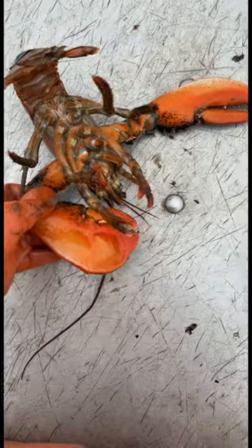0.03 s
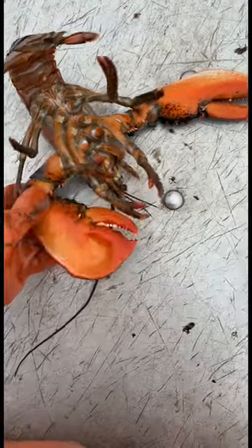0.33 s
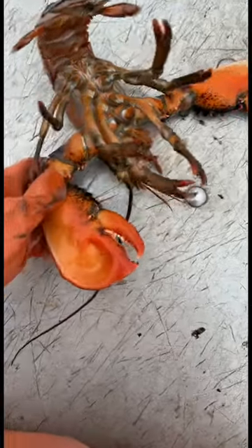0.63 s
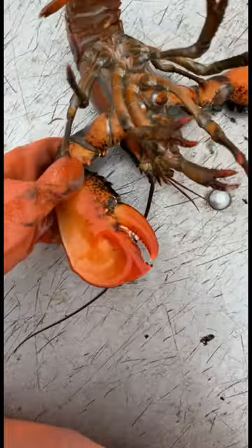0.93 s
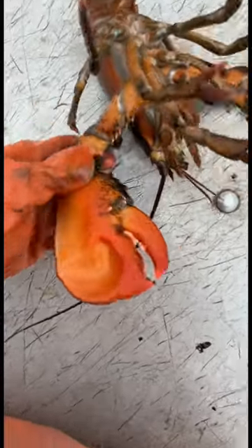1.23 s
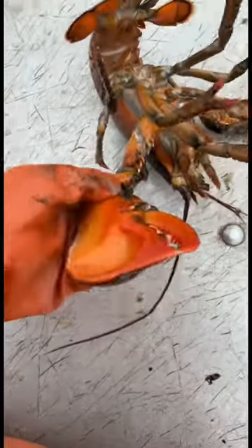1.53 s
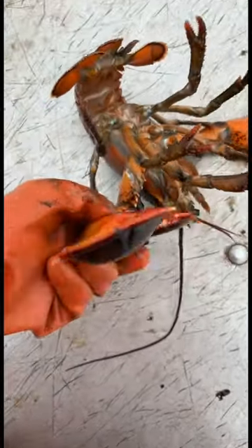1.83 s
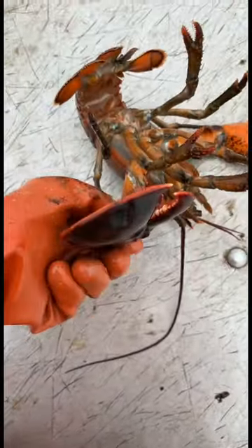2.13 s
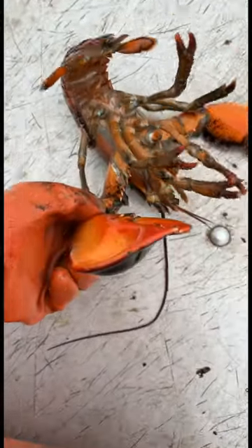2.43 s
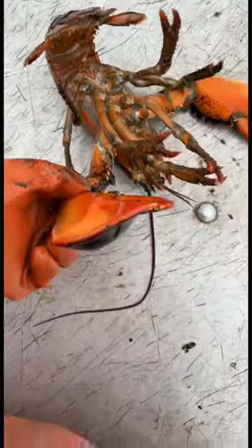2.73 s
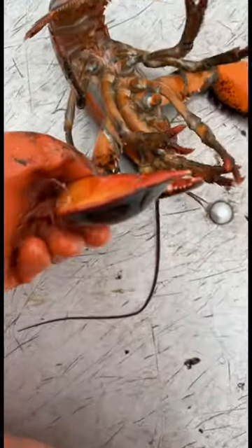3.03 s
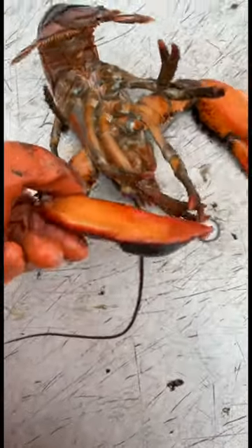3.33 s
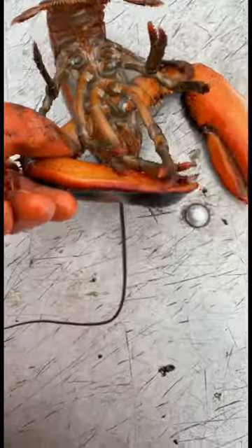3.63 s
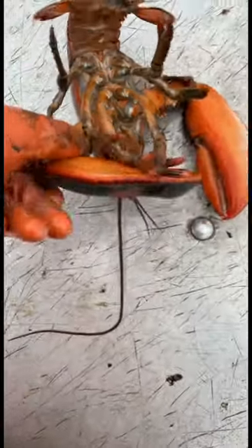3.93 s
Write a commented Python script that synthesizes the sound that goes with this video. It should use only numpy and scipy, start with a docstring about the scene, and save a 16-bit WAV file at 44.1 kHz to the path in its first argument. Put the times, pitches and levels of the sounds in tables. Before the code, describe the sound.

A fishing boat's engine runs steadily with a deep drone and machinery hiss.

```python
"""A fishing boat's engine running steadily, from a moving microphone just above the deck.
After 0.2 s of silence the sound cuts in: engine orders beat against a second machine's deep drone,
the hull rumbles with each firing and machinery hiss fills the treble, loudest in the first second.
As the microphone moves, a close reflection sweeps the hiss like a slow flanger.
Past halfway the reflection weakens, and by the end the microphone has left the hull's boom."""
import sys
import numpy as np
from scipy import signal
from scipy.fft import rfft, irfft
from scipy.io import wavfile
from scipy.ndimage import uniform_filter1d, minimum_filter1d, map_coordinates

SR = 44100
rng = np.random.default_rng(int(sys.argv[2]) if len(sys.argv) > 2 else 0)


def store_pcm(level_fs):
    """Save levels as 16-bit WAV."""
    pcm = np.round(np.clip(level_fs, -1, 1) * 32767).astype(np.int16)
    wavfile.write(sys.argv[1], SR, np.atleast_2d(pcm).T)


N = 176400
T = np.arange(N) / SR
FREQS = np.fft.rfftfreq(N, 1 / SR)

# machinery hiss: f/Hz, relative density/dB
HISS_SPECTRUM = [(200, -84), (600, -63.5), (800, -67), (950, -63), (1400, -70), (2000, -73.5),
                 (3200, -76.5), (4800, -84), (6000, -85.5), (7300, -88), (8500, -94.5), (10400, -97),
                 (11800, -105), (13500, -99), (16000, -99)]
# narrow resonances in the hiss: f/Hz, width/Hz, lift/dB
HISS_RESONANCES = [(914, 28, 1), (1133, 82, 2), (1457, 29, 4.5), (1860, 240, 1.5), (2360, 41, 3.5),
                   (2754, 55, 3), (2940, 21, 3.5), (3173, 37, 4), (4130, 180, 0.5), (5430, 60, -2)]
# brief swells in the hiss: t/s, half length/s, f/Hz, width/Hz, lift/dB
HISS_SWELLS = [(0.23, 0.089, 3800, 1000, 1.5), (0.63, 0.24, 6300, 980, 3.5), (1.45, 0.26, 2780, 1200, 6),
               (1.4, .22, 7400, 1300, 3), (3.63, 0.36, 3130, 340, 5.5)]
# reflection off a surface close to the microphone: t/s, lag/ms, strength/0-1
CLOSE_REFLECTION = [(.25, .25, .45), (.4, .228, .45), (.6, .19, .42), (.8, .183, .48), (1.05, .192, .45),
                    (1.25, .158, .48), (1.47, .135, .5), (1.62, .145, .42), (1.8, .232, .44),
                    (2.0, .242, .47), (2.33, .232, .42), (2.55, .17, .27), (2.78, .11, .22),
                    (3.2, .108, .22), (3.45, .13, .15), (3.68, .18, .27), (4, .185, .27)]
# hull rumble: f/Hz, relative density/dB
HULL_SPECTRUM = [(20, -75), (40, -49.5), (55, -48), (80, -48), (118, -42.5), (140, -52.5), (175, -46.5),
                 (230, -54), (270, -45), (310, -44), (365, -44), (430, -57), (480, -55.5), (530, -55),
                 (580, -55.5), (660, -73.5), (800, -61.5), (1300, -94), (3000, -130)]
# second machine: multiple of its speed, level/dB
DRONE_ORDERS = [(1, -19), (2, -37), (3, -36), (7, -41.5)]
# engine, every third order a firing harmonic: multiple of the cycle rate, relative level/dB
ENGINE_ORDERS = [(3, -48.5), (4, -31), (5, -37.5), (6, -24), (7, -43.5), (9, -29), (10, -47.5), (11, -35),
                 (12, -39), (13, -35), (14, -35.5), (15, -22), (16, -47), (17, -39.5), (18, -23.5),
                 (19, -31.5), (20, -35.5), (21, -43.5), (22, -35.5), (24, -44), (25, -52.5), (30, -40.5),
                 (32, -40.5), (33, -48), (34, -44.5)]
# balance along the microphone's path: t/s, bass/dB, extra hull boom/dB, hiss/dB, extra top treble/dB
MIC_BALANCE = [(.21, 3, 6.5, 2.5, 1), (.27, 1.5, -1.5, 5, 4.5), (.38, 0.6, 4, 3, 0), (.68, 2.5, 1, 5.5, 1),
               (.8, 0, 4, 2.5, 1), (1.15, 0.2, -1, 1.9, -1), (1.44, 1.1, 1.5, 1, 1),
               (1.66, -1, -2.5, -0.5, -1), (2.2, -2, 2, -0.5, 0.5), (2.7, -.7, -1.5, 0.5, 0.5),
               (2.98, -1, -2, -0.5, 0.5), (3.1, -1, -4.5, 0, 1), (3.25, -1.5, 1.5, -1.5, 1.5),
               (3.55, -2, -2, -1.5, -1), (3.77, 1, -5.5, -1.8, -2), (4, -1, -3, -1, 0.5)]

CYCLE_HZ, FIRINGS_PER_CYCLE, DRONE_HZ = 16.945, 3, 53.35
HULL_LAG = .226  # turns per order squared
BOOM_BAND_HZ, REFLECTION_BAND_HZ = (303, 456), (1520, 10300)


def amp(db):
    """Decibels to gain."""
    return 10 ** (np.asarray(db) / 20)


def curves(table):
    """Each column of a time table after the first, per sample."""
    times, *columns = np.transpose(table)
    return [np.interp(T, times, column) for column in columns]


def wobble(hz):
    """Smooth random motion of unit size, up to about hz."""
    x = irfft(rfft(rng.standard_normal(N)) * np.exp(-(FREQS / hz) ** 2) * (FREQS > 0), N)
    return x / x.std()


def noise(spectrum):
    """Noise with the given density spectrum."""
    hz, db = np.transpose(spectrum)
    density = amp(np.interp(np.log(FREQS + 1), np.log(hz), db))
    return irfft(rfft(rng.standard_normal(N)) * density, N) * np.sqrt(SR / 2)


def passband(x, hz, kind="band", order=1):
    """Gentle filter without delay."""
    return signal.sosfiltfilt(signal.butter(order, hz, kind, fs=SR, output="sos"), x)


def delayed(x, ms):
    """The sound, late by a changing lag."""
    return map_coordinates(x, [np.arange(N) - ms * SR / 1000], order=3, mode="nearest")


def hiss(firing, level_db, treble_db):
    """Machinery hiss that throbs lightly with the firings and flickers."""
    x = noise(HISS_SPECTRUM) * (1 + .07 * firing)
    x = x + passband(x, 6000, "high", order=2) * (amp(treble_db) - 1)
    flicker_db = 0.57 * wobble(hz=30)
    return x * amp(level_db - 0.5 + flicker_db)


def resonances(x):
    """The machinery rings at narrow resonances, which colour the hiss."""
    lift_db = sum(db / (1 + (2 * (FREQS - hz) / width) ** 2) for hz, width, db in HISS_RESONANCES)
    return irfft(rfft(x) * amp(lift_db), N)


def swells(x):
    """Single bands of the hiss rise for a moment."""
    swollen = x.copy()
    for at, half_length, hz, width, db in HISS_SWELLS:
        lift = amp(db * np.exp(-((T - at) / half_length) ** 2))
        swollen += (lift - 1) * passband(x, (hz - width / 2, hz + width / 2))
    return swollen


def reflections(x, far_surfaces=6):
    """Farther surfaces mottle the hiss; a close one sweeps a comb through it as the microphone moves."""
    far_lags_ms = [rng.uniform(1.482, 9) + 0.16 * wobble(hz=1) for _ in range(far_surfaces)]
    x = x + 0.075 * sum(delayed(x, ms) for ms in far_lags_ms)
    close_lag_ms, strength = curves(CLOSE_REFLECTION)
    return x + strength * delayed(passband(x, REFLECTION_BAND_HZ), close_lag_ms)


def hull(firing):
    """Broad hull resonances under the microphone, shaken by each firing."""
    return amp(-3.5) * noise(HULL_SPECTRUM) * (1 + 0.15 * firing)


def shaft(hz, wander=0.00094, jitter=0.0014):
    """Turns made by a governed shaft whose speed is slightly unsteady."""
    return np.cumsum(hz * (1 + wander * wobble(hz=0.86) + jitter * wobble(hz=17))) / SR


def hum(turns, orders, drift_db=0.63):
    """Harmonics of a shaft, each drifting in strength; higher ones lag in phase through the hull."""
    x = np.zeros(N)
    for order, db in orders:
        peak = np.sqrt(2) * amp(db + drift_db * wobble(hz=1.36))
        x += peak * np.cos(2 * np.pi * (order * turns - HULL_LAG * order ** 2))
    return x


def drone():
    """A second machine hums at its own speed, so it beats against the engine."""
    return hum(shaft(DRONE_HZ), DRONE_ORDERS)


def engine(turns, shake=0.095):
    """Engine orders, with firings of slightly uneven strength."""
    return amp(1) * hum(turns, ENGINE_ORDERS) * (1 + shake * wobble(hz=17))


def scene():
    """Hiss, hull, drone and engine at one microphone moving above the deck."""
    bass_db, boom_db, hiss_db, treble_db = curves(MIC_BALANCE)
    turns = shaft(CYCLE_HZ)
    firing = np.cos(2 * np.pi * FIRINGS_PER_CYCLE * turns)  # pressure swing
    bass = engine(turns) + drone() + hull(firing)
    bass = bass + passband(bass, BOOM_BAND_HZ, order=2) * (amp(boom_db) - 1)
    machinery = swells(resonances(hiss(firing, hiss_db, treble_db)))
    return (bass * amp(bass_db) + reflections(machinery))[None]


def record(dry, start_s=.2102, knee=0.77, headroom=.02, cutoff_hz=15800):
    """The sound cuts in after a brief quiet lead; a quick limiter holds the peaks; a low-pass follows."""
    rise = lambda at: np.clip((T - at) / 0.00071, 0, 1)
    cut_in = np.maximum(rise(start_s), amp(-19) * rise(start_s - .01))
    fade_out = np.minimum((T[-1] - T) / .004, 1)
    x = dry * cut_in * fade_out
    size = np.maximum(abs(x), knee)
    gain = (knee + headroom * np.tanh((size - knee) / headroom)) / size
    x = x * uniform_filter1d(minimum_filter1d(gain, size=65), size=65)
    low_pass = signal.firwin(511, cutoff_hz, window=("kaiser", 9), fs=SR)
    return signal.oaconvolve(x, low_pass[None], "same")


dry = scene()
out = record(dry)
store_pcm(out)
```